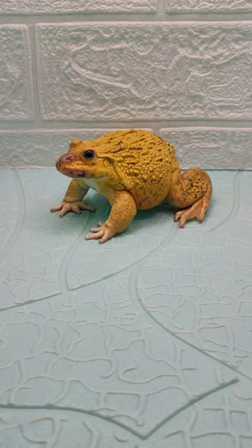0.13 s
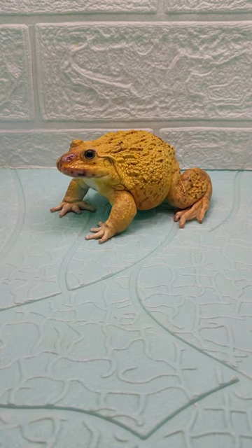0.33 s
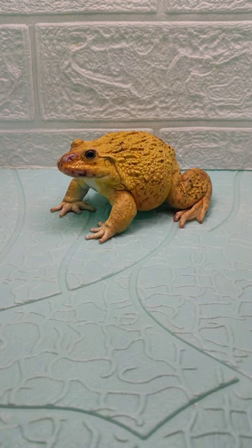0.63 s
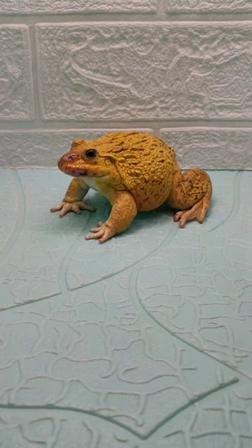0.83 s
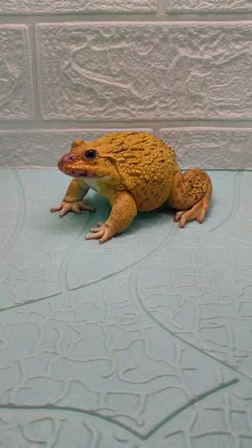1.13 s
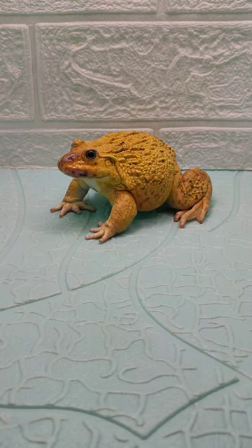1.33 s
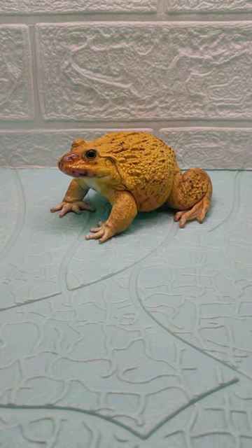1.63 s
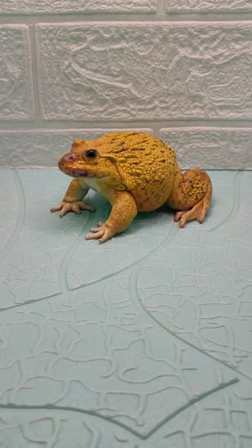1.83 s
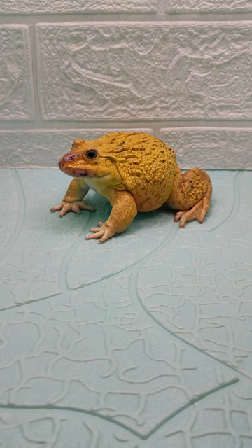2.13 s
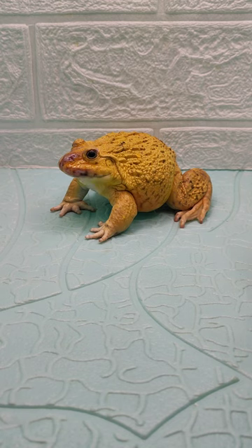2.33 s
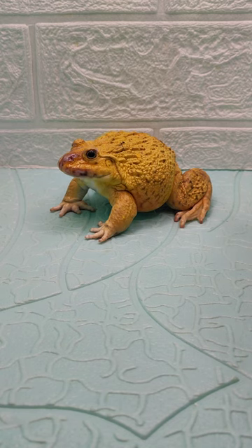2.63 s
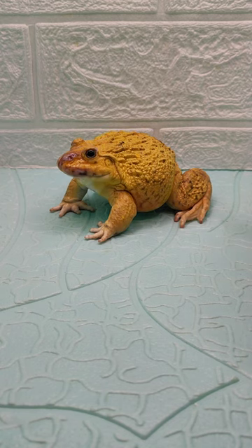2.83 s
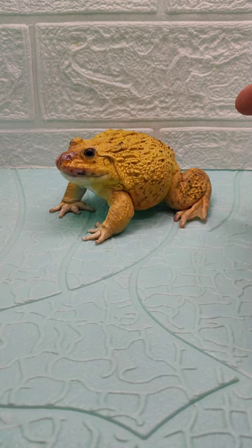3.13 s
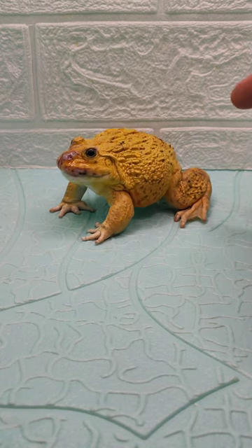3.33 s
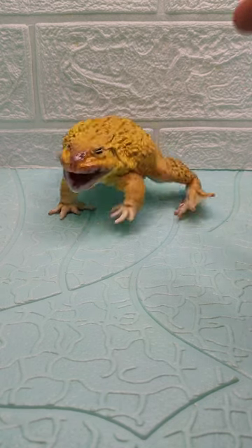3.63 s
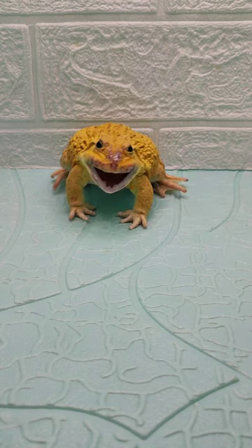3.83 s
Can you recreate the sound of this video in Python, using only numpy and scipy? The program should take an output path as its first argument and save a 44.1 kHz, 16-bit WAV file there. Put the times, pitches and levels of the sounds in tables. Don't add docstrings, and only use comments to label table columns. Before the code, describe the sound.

Frog scream, high, harsh and very short, bursting out after seconds of faint fan hum

```python
import sys
import numpy as np
from scipy import signal
from scipy.fft import rfft, irfft
from scipy.io import wavfile
from scipy.ndimage import uniform_filter1d

SR = 44100
rng = np.random.default_rng(int(sys.argv[2]) if len(sys.argv) > 2 else 0)


def to_wav(sig):
    pcm = np.clip(np.atleast_2d(sig), -1, 1) * 32767
    pcm = np.round(pcm).astype(np.int16)
    wavfile.write(sys.argv[1], SR, pcm.T)


def decibels_to_gain(level_db):
    exponent = np.asarray(level_db, float) / 20
    return 10 ** exponent


N = 176400

# (time [s], fold rate [Hz], effort [dB])
CRY_OPEN = [(3.607, 1640, -12), (3.616, 1756, -15.5), (3.63, 1910, -14.5), (3.654, 1886, -16),
            (3.668, 1784, -13.5), (3.68, 1628, -14.5), (3.7, 1442, -18), (3.732, 1424, -14),
            (3.75, 1437, -19), (3.756, 1438, -21)]
CRY_TURN = [(3.762, 1546, -17.5), (3.777, 1480, -20.5), (3.795, 1537, -16.5), (3.815, 1419, -21.5),
            (3.829, 1382, -19), (3.841, 1452, -19.5), (3.93, 1400, -17.5)]
CRY_DROP = [(3.945, 1340, -18.5), (3.961, 1314, -21), (3.979, 1190, -19.5), (3.991, 1069, -25),
            (3.999, 980, -23)]
# (start [s], end [s], boost of in-between tones [dB], left excess [dB])
DOUBLING = [
    (3.757, 3.812, 36.5, 12),
    (3.812, 3.842, 36, 3.5),
    (3.842, 3.912, 25, 5),
    (3.968, 4.05, 24, -8),
]
# (start [s], end [s], boost [dB])
HOARSE = [
    (3.59, 3.622, 35),
    (3.66, 3.70, 22),
    (3.755, 3.84, 26),
    (3.968, 4.05, 25),
]
# (centre [Hz], width [Hz], level [dB])
MOUTH_SIDE = [(730, 500, -34), (1510, 1000, -1), (3314, 810, 4), (5000, 3800, -9.5), (9590, 1120, -0.5),
              (11280, 1040, -1.5), (13600, 2300, -6), (15400, 990, -12)]
MOUTH_FRONT = [(765, 290, -6), (1400, 380, -6), (2650, 1500, -5.5), (4000, 1800, -3), (6700, 1900, -14),
               (8870, 570, -3), (10980, 2740, -0.5), (13930, 580, 2), (15200, 610, -2)]
# (frequency [Hz], left minus right [dB])
LEAN_SIDE = [(700, 3), (1500, 4), (2800, -6), (4300, 4), (7000, 10.5), (9000, 4), (11300, -15),
             (15000, -1.5)]
LEAN_FRONT = [(700, 14.5), (1500, 13.5), (2850, -1), (4300, -3.5), (7100, 11), (8600, 10.5), (11300, -16.5),
              (15000, -8)]
# (time [s], left [dB], right [dB])
THROAT_SAC = [(3.6, 16, 11), (3.612, -7, -3), (3.64, 6.5, -4), (3.665, -3, -4), (3.7, -12, -14),
              (3.72, 3.5, -9), (3.742, 4, 5), (3.76, -6, -21), (3.8, 6, 1), (3.82, -11, -12),
              (3.875, -4, -12), (3.9, -8, -5), (3.92, 4.5, 13), (3.94, 7.5, -12), (3.96, 4, -8),
              (3.985, -8, -13)]
# (time [s], level [dB])
HISS_LEVEL = [
    (3.17, -90),
    (3.21, -64),
    (3.4, -64),
    (3.5, -55.5),
    (3.585, -55.5),
    (3.6, -50),
]
# (centre [Hz], width [Hz], level [dB])
HISS_BANDS = [(8500, 900, -15), (10700, 1900, -1), (13000, 1800, -9.5)]
# (frequency [Hz], level [dB])
CRACKLE_TONE = [(20, -14), (60, -6), (200, -5.5), (500, -6), (1200, -10.5), (2200, -15), (3200, -21.5),
                (16000, -59)]
# (time [s], peak level [dB], left minus right [dB])
CRACKLE_BURSTS = [(3.616, -27, 9), (3.626, -21.5, 5), (3.637, -18, 8), (3.658, -31, 2), (3.661, -21.5, 0.0),
                  (3.667, -21.5, -5.0), (3.682, -21, 9), (3.692, -27, 10.0), (3.702, -22, -5), (3.717, -25, 9.0),
                  (3.726, -25, 10), (3.744, -26, 5), (3.761, -22.5, 16.5), (3.766, -16.5, 4), (3.781, -17, -5),
                  (3.79, -25, -2.0), (3.8, -17.5, 5), (3.808, -17, 2), (3.821, -23, 1), (3.832, -20, 5),
                  (3.849, -22, 17), (3.862, -23, 6), (3.871, -31, 10), (3.887, -27, 2), (3.898, -23, 1),
                  (3.911, -27, -2), (3.92, -31, 2.0), (3.931, -27, 3.5), (3.947, -30, 1.0), (3.961, -21, 17.5),
                  (3.968, -26, 11.0), (3.977, -22.5, 20)]
# (time [s], length [s], left height [full scale], right height [full
THUMPS = [(3.62, 0.0052, 0.11, 0.11), (3.627, 0.0034, -0.1, -0.25), (3.665, 0.0053, 0.087, 0.17),
          (3.669, 0.0019, 0.0077, -0.13), (3.689, 0.0049, 0.027, 0.12), (3.703, 0.005, -0.096, -0.096),
          (3.724, 0.0055, 0.2, 0.0073), (3.746, 0.013, -.06, -0.098), (3.769, 0.0065, -0.14, 0.043),
          (3.776, 0.0049, -0.053, -0.11), (3.815, 0.0025, 0.11, 0.047), (3.834, 0.0047, -0.034, -0.2),
          (3.893, 0.005, 0.15, -0.041), (3.923, 0.013, 0.096, 0.05), (3.967, 0.0042, 0.2, 0.051),
          (3.972, 0.0024, -0.14, -0.011), (3.978, 0.002, -0.23, 0.027)]
# (time [s], length [s], level [dB], centre [Hz])
CREAKS = [
    (2.336, 0.063, -59, 2100),
    (2.423, 0.057, -54.5, 2290),
    (2.40, .08, -62, 3600),
    (3.2, .03, -63, 4000),
]
# (frequency [Hz], level [dB])
FAN_TONES = [
    (60, -63),
    (136, -61),
    (204, -63),
]
# (frequency [Hz], left level per Hz [dB], right level per Hz [dB])
AIR_TONE = [(14.9, -10, -14), (60, -5, -3.5), (200, -6, -7.5), (500, -15.5, -13.5), (1030, -18.5, -15.5),
            (2930, -25, -20.5), (5720, -30.5, -32.5), (16000, -39, -37)]
# (centre [Hz], width [Hz], left [dB], right [dB])
AIR_BUMPS = [(63, 22, 6.5, 5), (135.9, 22, 8.5, 7.5), (204, 17.7, 8, 7), (302, 58, -7.5, -1.5),
             (467, 72, 8, 5.5), (657, 88, -5.5, 4.5), (770, 57, 5.5, 3.5), (1035, 17, 6.5, 4),
             (2210, 1450, 1.5, 4), (2930, 520, -2, -5.5), (3690, 860, -2.5, 6.5), (7500, 1600, 0, -2.5),
             (10600, 4800, -2.5, 5.5)]
# (frequency [Hz], likeness [0-1])
AIR_LIKENESS = [(60, 1), (230, 0.99), (290, 1), (420, 1), (600, 0.13), (1000, 0.1), (4500, 0.23),
                (12000, 0)]
# (frequency [Hz], lead [rad])
AIR_LEAD = [(60, 0.5), (300, -1.83), (550, 0.34), (800, 2.5), (2000, 4), (3500, 4), (4500, 8), (8000, 14.5)]


def evened(x):
    return x / np.sqrt(np.mean(x ** 2) + 1e-20)


def read(points, hz):
    f, value = np.transpose(points)
    return np.interp(np.log(hz + 1), np.log(f + 1), value)


def humps(table, hz):
    power = sum(decibels_to_gain(2 * db) / (1 + (2 * (hz - f) / width) ** 2) ** 2 for f, width, db in table)
    return np.sqrt(power)


def drift(shape, size):
    smooth = uniform_filter1d(rng.standard_normal(shape), size)
    return evened(uniform_filter1d(smooth, size))


def coloured(gain, channels):
    hz = np.fft.rfftfreq(N, 1 / SR)
    spectrum = rfft(rng.standard_normal((channels, N)))
    return evened(irfft(spectrum * gain(hz), N))


def step(t, s, length):
    return np.clip((t - s) / length + 0.5, 0, 1)


def spells(table, t, edge):
    return sum(np.outer(boosts, step(t, start, edge) - step(t, end, edge)) for start, end, *boosts in table)


def scream():
    rise_s = 0.0064
    rows = np.vstack([CRY_OPEN, CRY_TURN, CRY_DROP])
    start = round((rows[0, 0] - rise_s) * SR)
    t = np.arange(start, N) / SR
    fold_hz, effort_db = (uniform_filter1d(np.interp(t, rows[:, 0], c), 200) for c in rows.T[1:])
    half_db, left_db = spells(DOUBLING, t, edge=0.003)
    hoarse_db = spells(HOARSE, t, edge=0.0022)[0]

    unsteady_hz = fold_hz * (1 + 0.0006 * drift(len(t), size=60))
    turns = np.cumsum(unsteady_hz) / SR / 2
    k = np.arange(1, 31)[:, None]
    side = np.array([0.5, -0.5])[:, None, None]
    f = k * fold_hz / 2
    lines = (2, 30, len(t))

    facing = step(t, 3.78, 0.03)
    mouth = (1 - facing) * humps(MOUTH_SIDE, f) + facing * humps(MOUTH_FRONT, f)
    lean_db = (1 - facing) * read(LEAN_SIDE, f) + facing * read(LEAN_FRONT, f)
    odd_db = (k % 2) * (-33.5 + half_db + side * left_db)
    shimmer_db = 1.95 * drift(lines, size=500)
    flutter_db = 0.07 * hoarse_db * drift(lines, size=200)
    gain = mouth * (f < 17000) * decibels_to_gain(side * lean_db + odd_db + shimmer_db + flutter_db)

    rasp = 1 + decibels_to_gain(-46 + hoarse_db) * drift(lines, size=24) * (1 + 1j)
    ports_lead_rad = 1.6
    phase = rng.uniform(0, 0.4, (30, 1)) * k + side * ports_lead_rad
    sac_s, *sac_sides = np.transpose(THROAT_SAC)
    sac_db = np.array([np.interp(t, sac_s, db) for db in sac_sides])[:, None]
    sac = decibels_to_gain((k == 2) * sac_db)
    waves = np.exp(1j * (2 * np.pi * k * turns + phase))
    voice = (gain * sac * rasp * waves).real.sum(1)
    voice /= np.sqrt((gain ** 2).sum((0, 1)) / 4)
    out = np.zeros((2, N))
    out[:, start:] = voice * decibels_to_gain(effort_db + 1.6) * np.minimum((t - t[0]) / rise_s, 1) ** 2
    return out


def hiss():
    t = np.arange(N) / SR
    s, db = np.transpose(HISS_LEVEL)
    breath = coloured(lambda hz: humps(HISS_BANDS, hz), channels=2)
    return breath * decibels_to_gain(np.interp(t, s, db, -120, -120)) * decibels_to_gain([[-1.5], [1.5]])


def crackle():
    t = np.arange(N) / SR
    level = decibels_to_gain(-37 + 2.5 * drift((2, N), size=round(SR / 60 / 2)))
    on = step(t, 3.612, 0.0059) - step(t, 3.982, 0.0075)
    for s, db, lean_db in CRACKLE_BURSTS:
        u = np.maximum(t - s, 0) / 0.0026
        burst = decibels_to_gain(db - 5.5) * u * np.exp(1 - u)
        level = level + np.outer(decibels_to_gain([lean_db / 2, -lean_db / 2]), burst)
    return coloured(lambda hz: decibels_to_gain(read(CRACKLE_TONE, hz)), channels=2) * level * on


def thumps():
    t = np.arange(N) / SR
    out = np.zeros((2, N))
    for s, length, *heights in THUMPS:
        u = np.clip((t - s) / length, -9, 9)
        out += np.outer(heights, (1 - 4 * u ** 2) * np.exp(-6 * u ** 2))
    return out


def creaks():
    t = np.arange(N) / SR
    out = np.zeros((2, N))
    for s, length, db, centre_hz in CREAKS:
        swell = np.exp(-2 * ((t - s) / length) ** 2)
        noise = coloured(lambda hz: humps([(centre_hz, 900, 0)], hz), channels=2)
        out += decibels_to_gain(db) * swell * noise
    return out


def room(x):
    t60_s, gap_s = 0.22, 0.0033
    taps = np.zeros((2, 12000))
    at = np.arange(0, 11980, 20) + rng.integers(0, 20, (2, 599))
    np.put_along_axis(taps, at, rng.choice([-1.0, 1.0], at.shape), 1)
    t = np.arange(12000) / SR
    taps *= decibels_to_gain(-60 * t / t60_s) * step(t, gap_s, 0.0011)
    return signal.fftconvolve(x, taps / np.linalg.norm(taps[0]), axes=1)[:, :N]


def fan_hum():
    hz, db = np.transpose(FAN_TONES)[:, :, None]
    shape = (len(FAN_TONES), N)
    turns = np.cumsum(hz * (1 + 0.03 * drift(shape, size=6000)), 1) / SR
    level = decibels_to_gain(db + 4.0 * drift(shape, size=4000))
    return np.array([(level * np.sin(2 * np.pi * turns + lead)).sum(0) for lead in (0.4, 0)])


def air():
    frames, hz = N // 512 + 5, np.fft.rfftfreq(2048, 1 / SR)
    a, b, c, d, patches = rng.standard_normal((frames, 1025, 5)).T
    patches = evened(uniform_filter1d(uniform_filter1d(patches, 16, 0), 6, 1))
    same = np.clip(read(AIR_LIKENESS, hz), 0, 1)[:, None]
    right = a + 1j * b
    left = same * right + np.sqrt(1 - same ** 2) * (c + 1j * d)
    left = left * np.exp(1j * read(AIR_LEAD, hz))[:, None]
    wash_db = np.array([read(np.array(AIR_TONE)[:, [0, column]], hz) for column in (1, 2)])
    bumps_db = sum(np.outer(db, np.exp(-2 * ((hz - f) / width) ** 2)) for f, width, *db in AIR_BUMPS)
    spectrum = np.array([left, right]) * decibels_to_gain((wash_db + bumps_db)[:, :, None] + 0.88 * patches)
    murmur = signal.istft(spectrum, nperseg=2048, noverlap=1536)[1][:, :N]
    return decibels_to_gain(-48) * evened(murmur)


def scene():
    frog = scream() + hiss()
    echoes = decibels_to_gain(-17) * room(frog)
    small_noises = crackle() + thumps() + creaks()
    return frog + echoes + small_noises + fan_hum() + air()


def band_limit(x):
    return signal.sosfilt(signal.butter(12, 16850, fs=SR, output="sos"), x)


def record(dry):
    clip = 2.0
    soft = clip * np.tanh(dry / clip)
    treble_cut = signal.firwin(511, 15850, window=("kaiser", 9), fs=SR)
    mix = signal.oaconvolve(soft, treble_cut[None], "same")
    return band_limit(mix)


dry = scene()
out = record(dry)
to_wav(out)
```